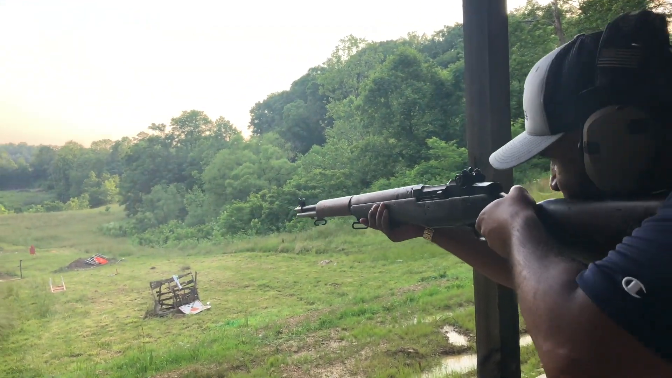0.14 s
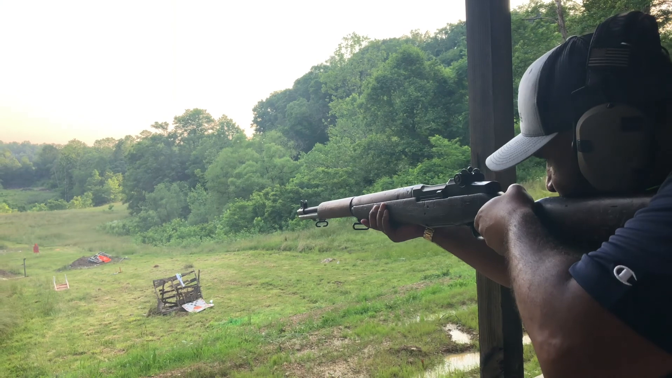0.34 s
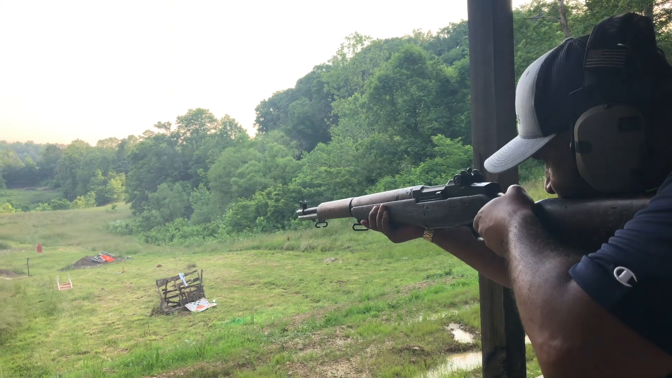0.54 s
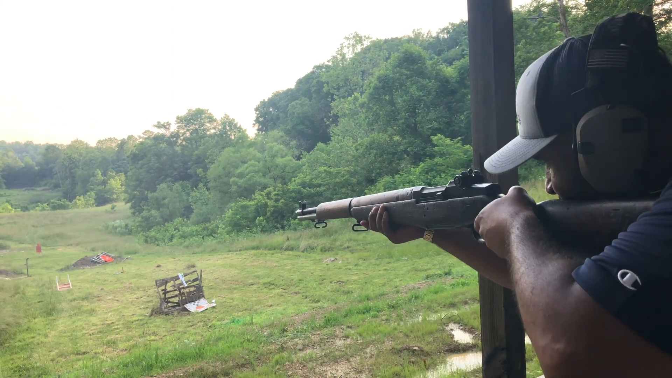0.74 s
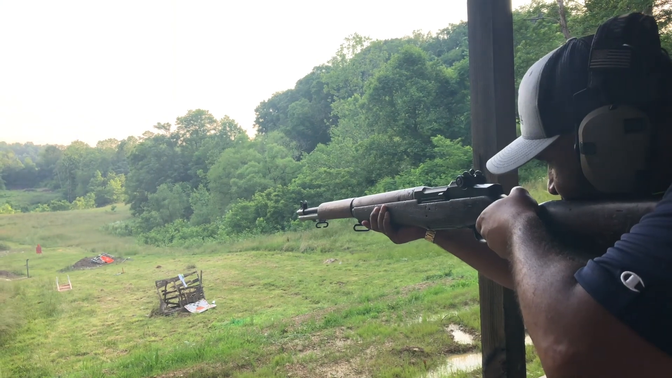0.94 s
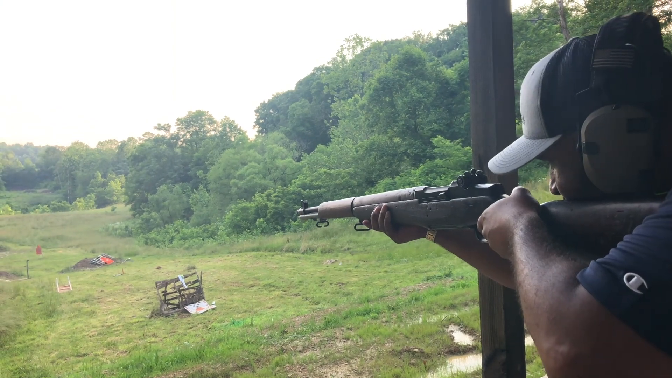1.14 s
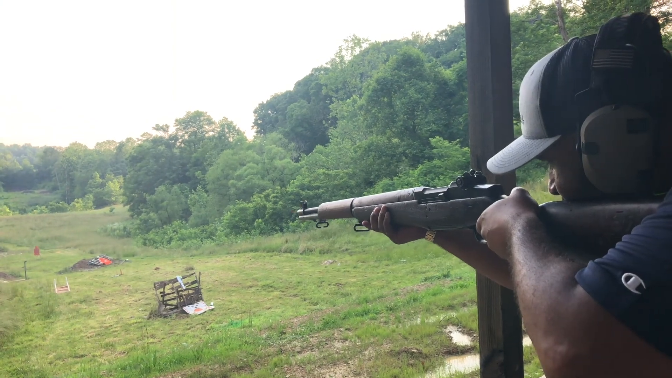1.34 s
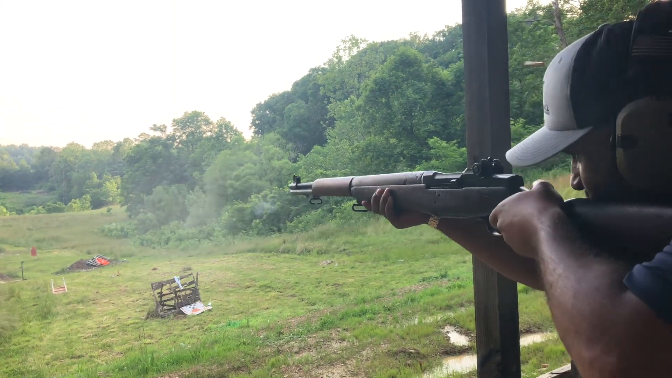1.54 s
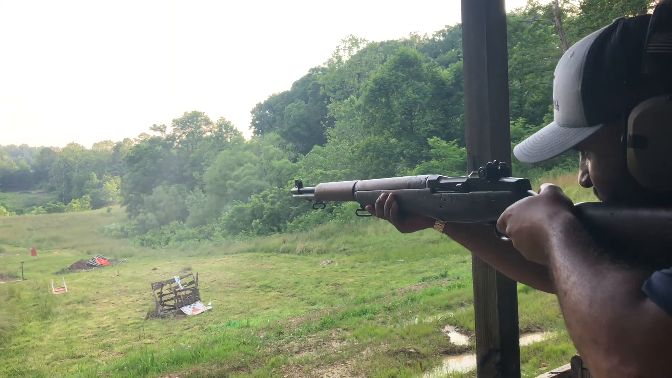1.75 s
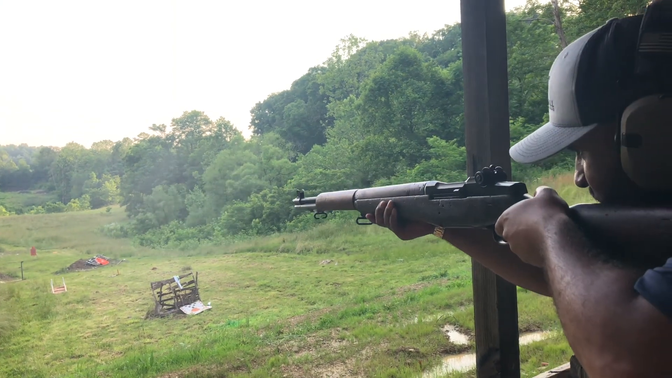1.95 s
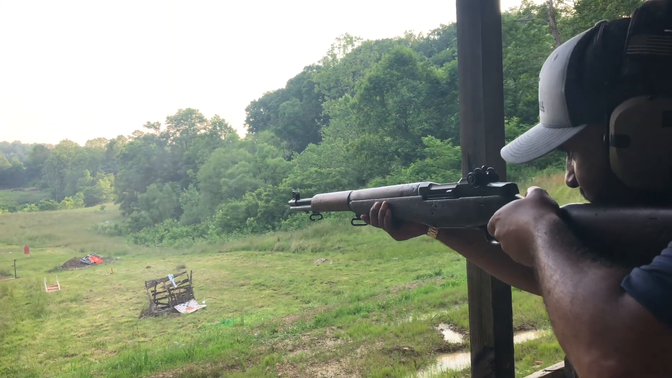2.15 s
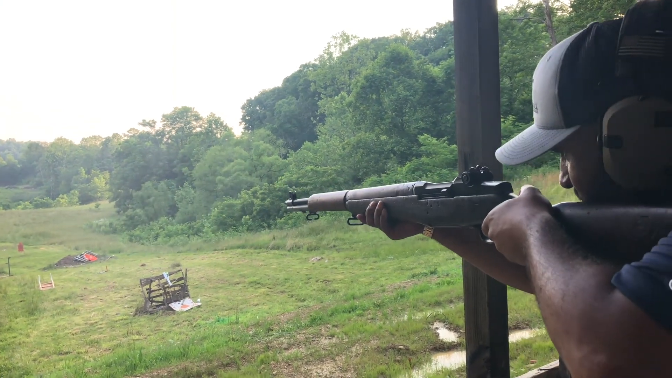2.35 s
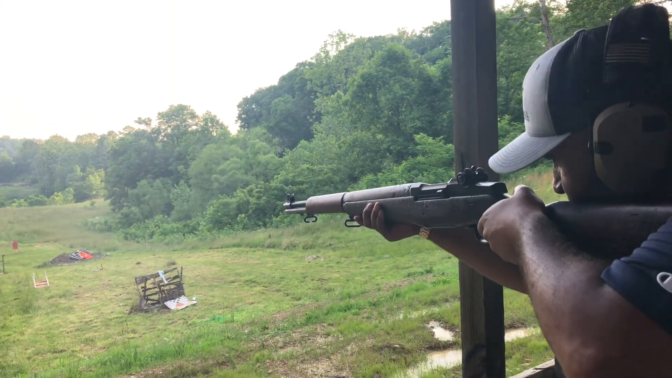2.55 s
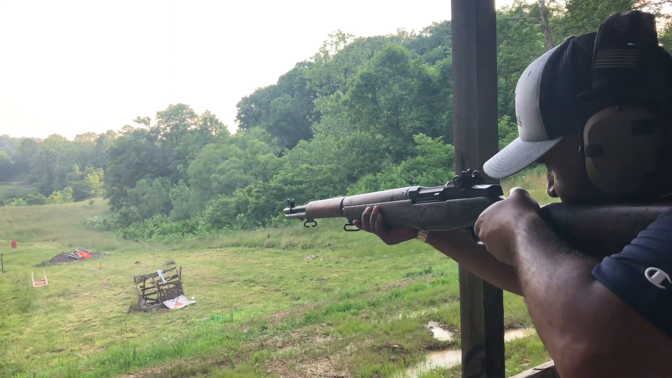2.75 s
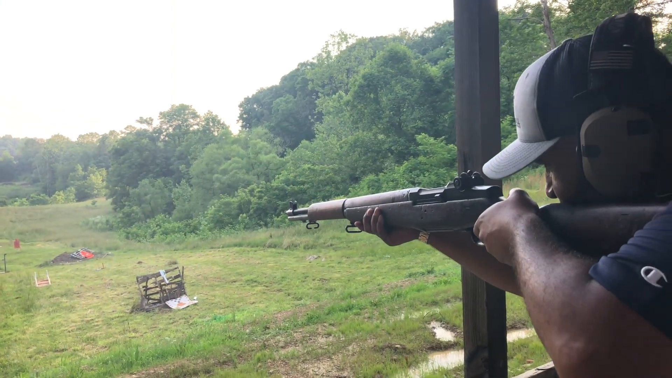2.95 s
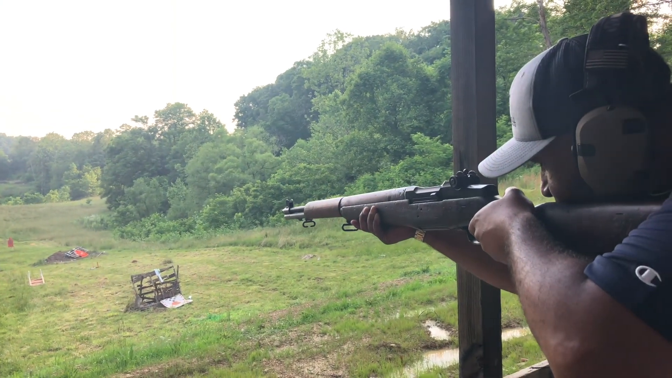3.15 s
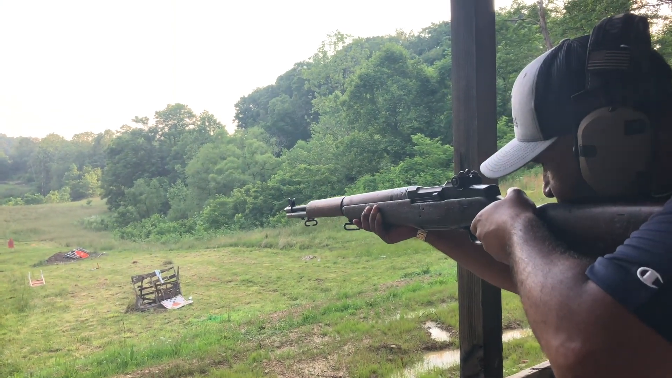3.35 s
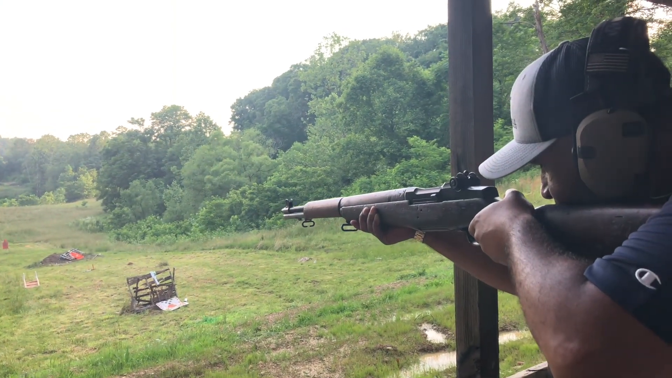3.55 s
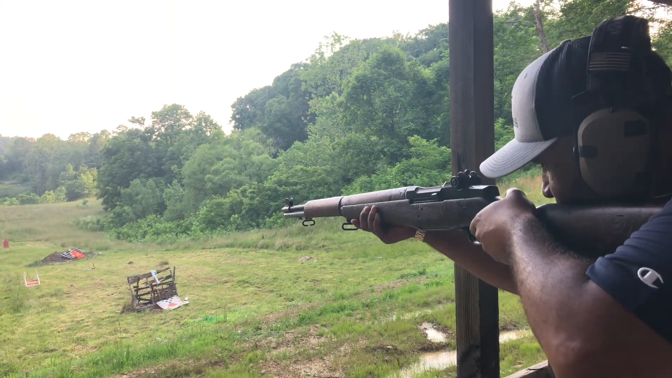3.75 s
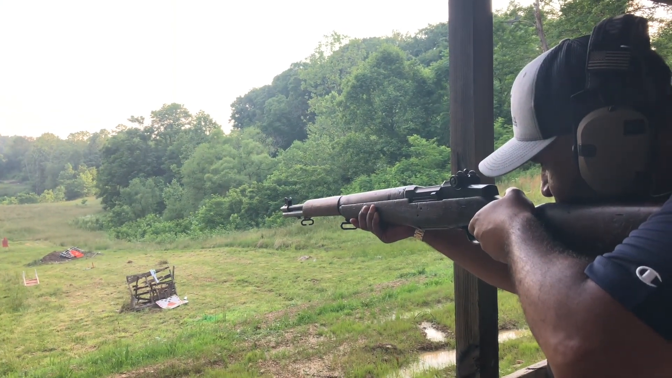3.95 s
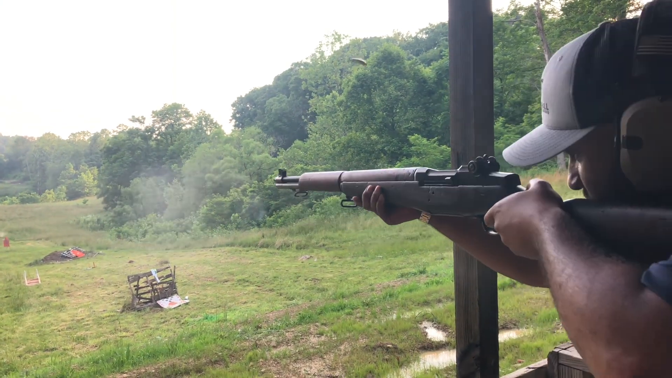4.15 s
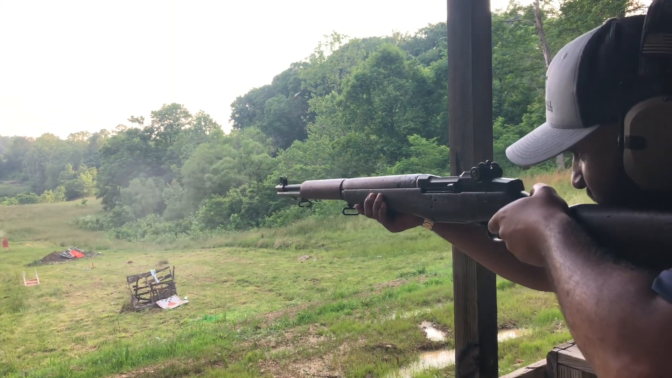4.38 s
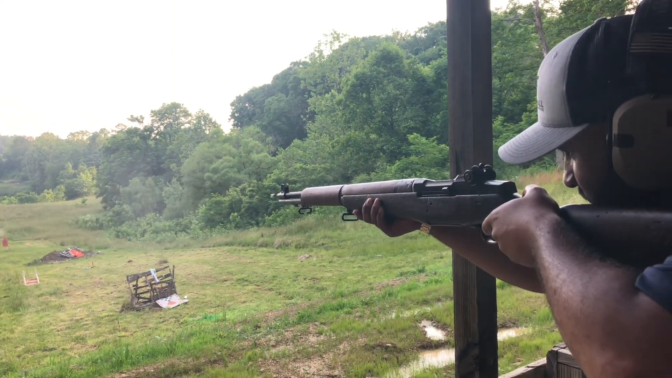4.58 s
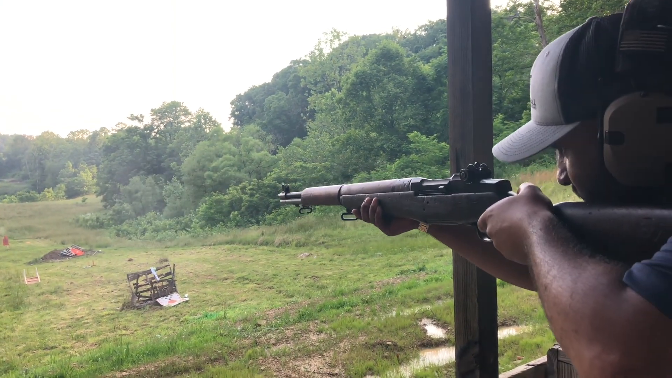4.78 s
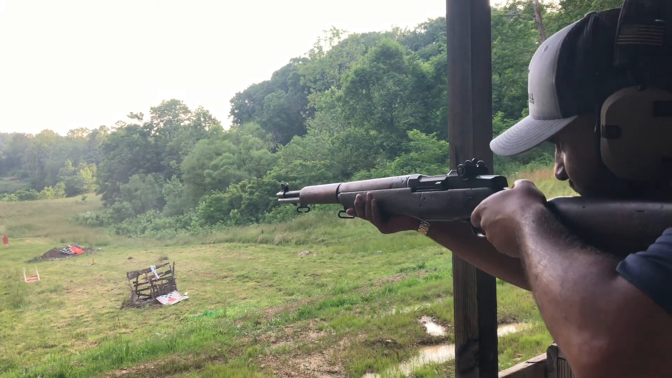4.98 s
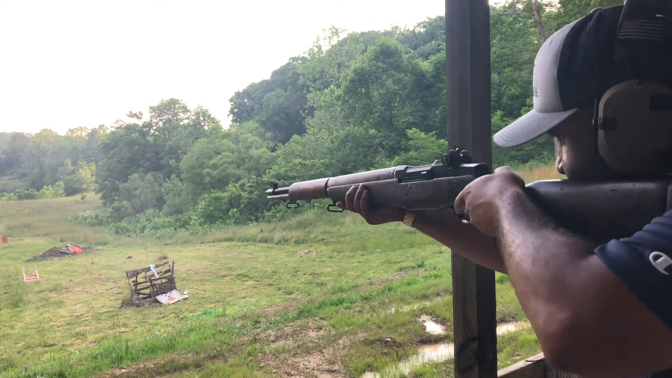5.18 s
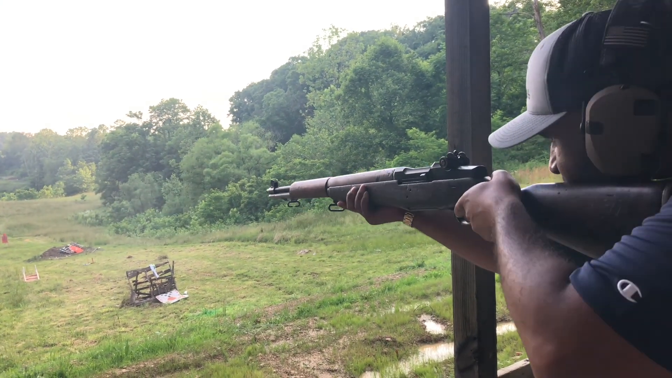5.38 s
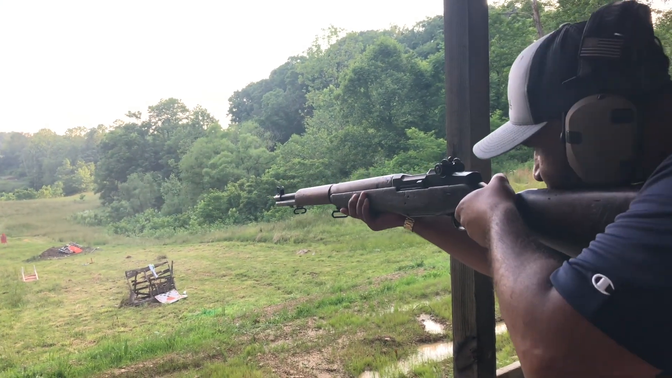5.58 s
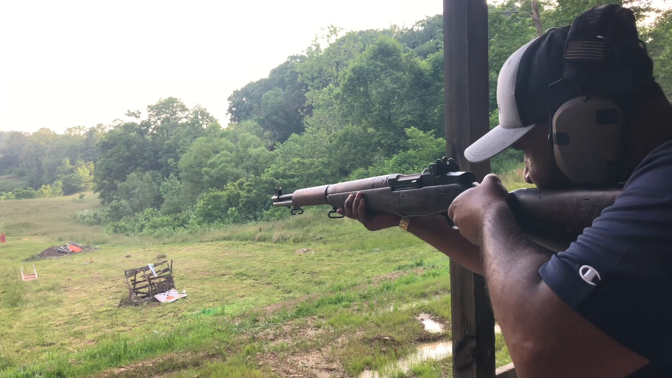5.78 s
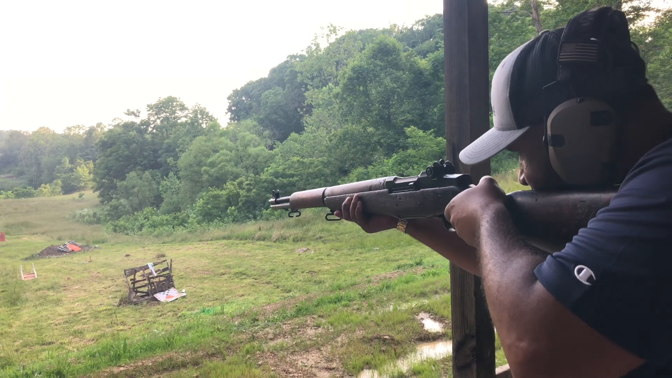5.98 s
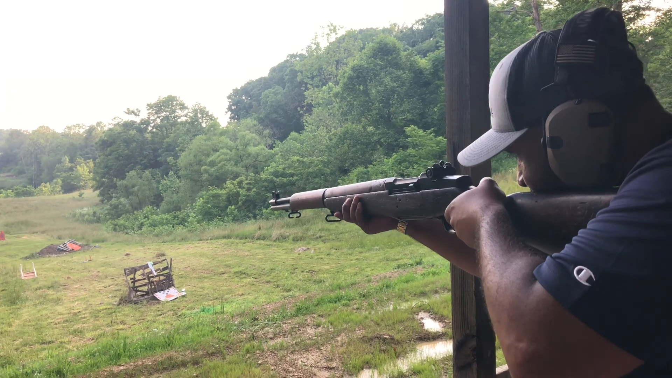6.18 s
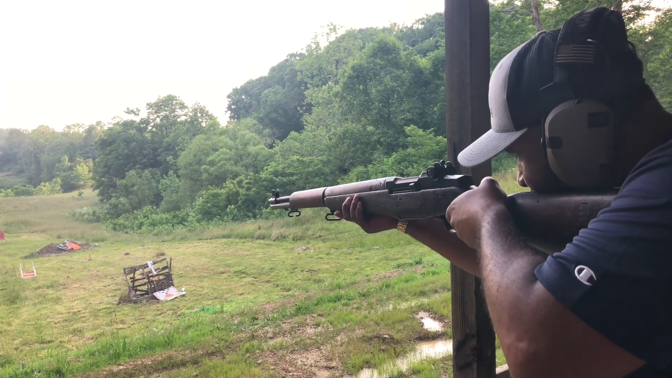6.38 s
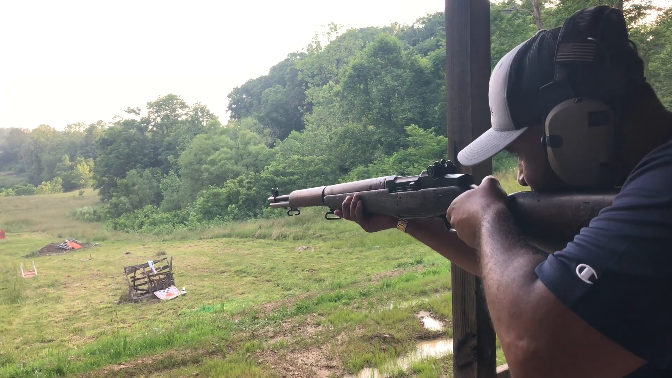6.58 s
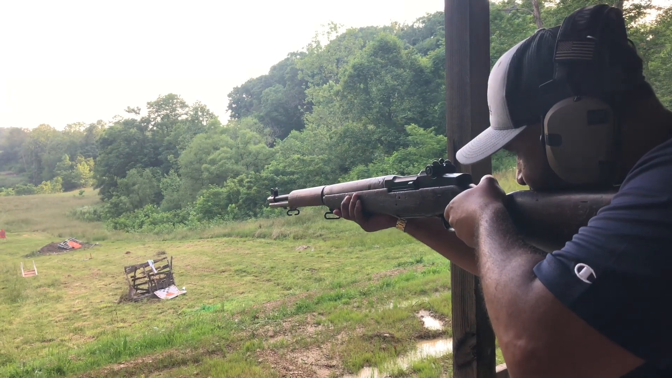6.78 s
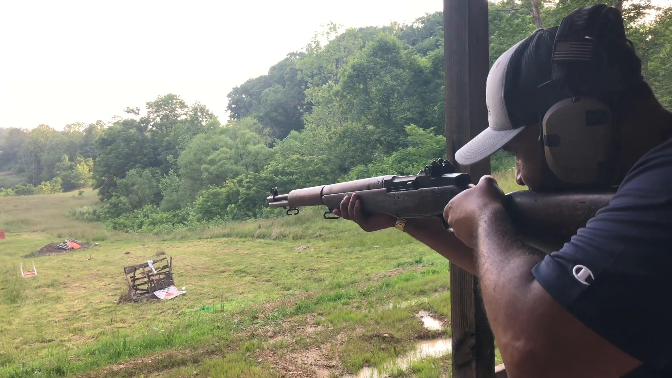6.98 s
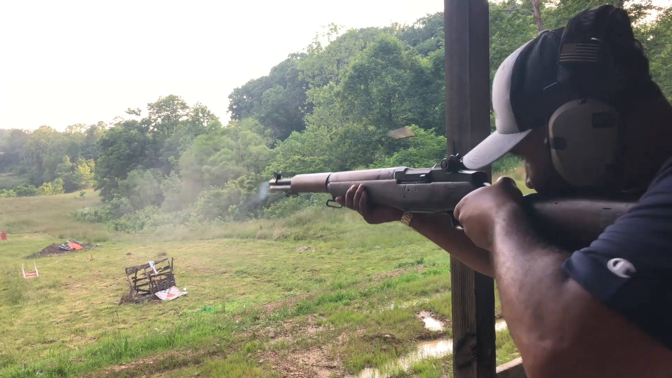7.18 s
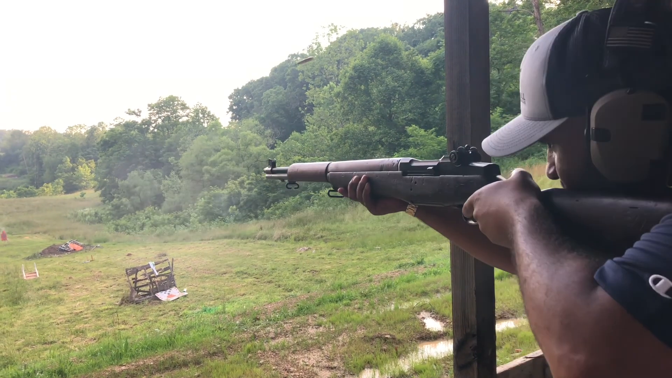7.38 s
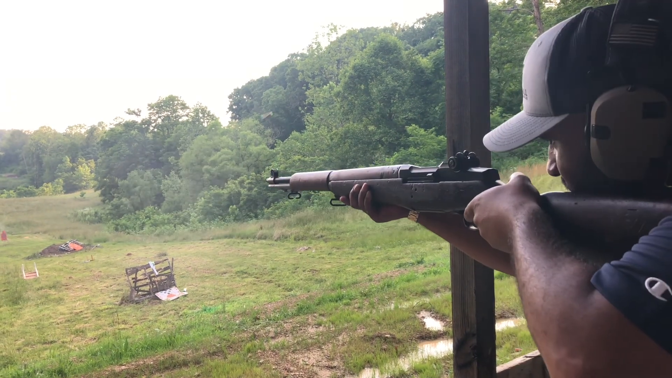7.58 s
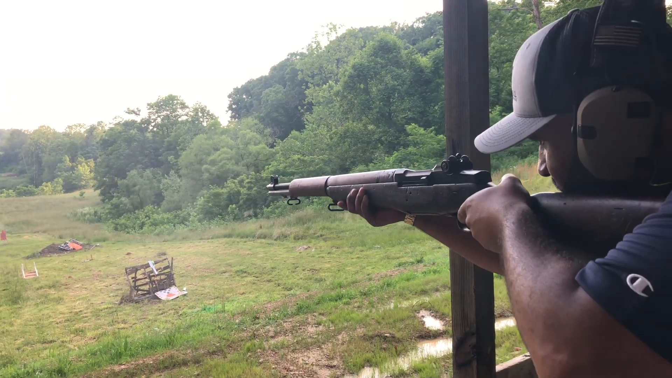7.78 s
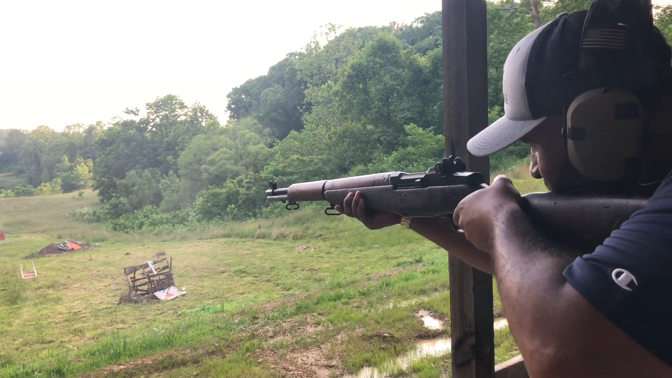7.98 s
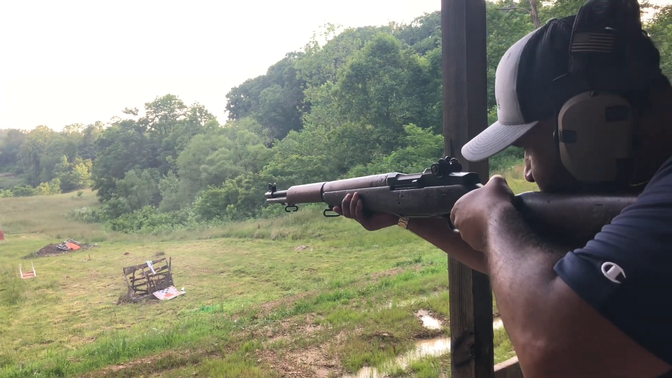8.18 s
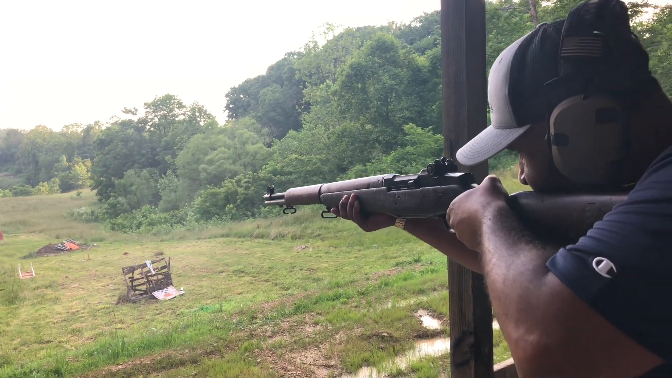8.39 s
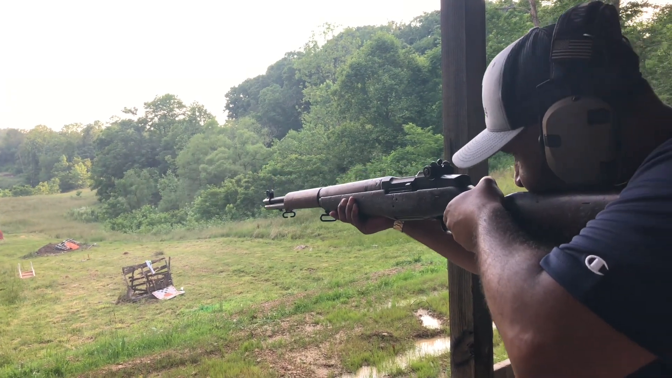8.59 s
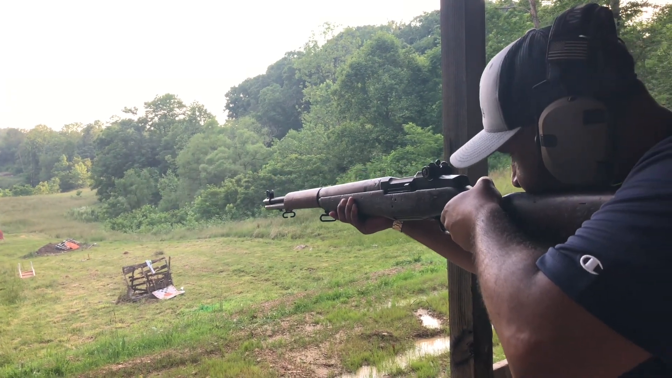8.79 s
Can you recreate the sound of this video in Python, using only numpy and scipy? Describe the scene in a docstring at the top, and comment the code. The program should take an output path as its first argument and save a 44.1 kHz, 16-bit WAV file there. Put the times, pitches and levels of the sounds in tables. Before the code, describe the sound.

Outdoors beneath a firing-point roof, heard in mono near the shooter. It starts with the dim echo tail of an earlier shot, a soft low far rumble, faint high insect song with brief rasps at 0.5 and 1.1 s, and a barely audible thin tone. At 1.4 s a tiny dry click runs into a massive rifle crack and boom, slapping off roof and ground, then rolling off the trees for seconds. A spent case ticks and pings at 2.4, 2.6 and 2.8 s. The second, slightly stronger shot comes at 4.0 s, its case landing at 5.0 and 5.2 s; the rumble swells gently around 6 s as insects return. The third shot hits at 7.15 s; at 7.5 s its bullet strikes steel, a tick and bright clang with wavering ringing, fading through the echoes. Fainter case pings follow at 8.2 and 8.5 s.

```python
"""A roofed firing point over a grass range ringed by trees, where a rifle fires single shots. Each report is
shaped noise whose echoes from roof, ground and tree lines follow much the same pattern. The last bullet strikes
a steel plate (a clang and wavering sines); spent cases tick and ring on the floor. Behind it all lie a far
rumble, singing insects and faint thin tones, all made from filtered noise; the thin tones at 920 and 1600 Hz
after the strike are the plate's low modes ringing on."""
import sys
import numpy as np
from scipy import signal
from scipy.io import wavfile

SR = 44100
rng = np.random.default_rng(int(sys.argv[2]) if len(sys.argv) > 2 else 0)


def generate_wav(sig):
    """Save sig (samples, or channels by samples) to the path in sys.argv[1] as 16-bit PCM at SR."""
    pcm = np.round(np.clip(np.atleast_2d(sig).T, -1, 1) * 32767).astype(np.int16)
    wavfile.write(sys.argv[1], SR, pcm)


N = 389403

# Rifle shots, the first one fired before we listen:
# (time [s], blast level [dB], near echo level [dB], far echo level [dB])
SHOT_LIST = [(-1.35, .1, .1, 3.5), (1.4225, .1, .1, .1), (4.0096, .8, 1.5, -1.2), (7.166, .6, .1, 1.5)]

PLATE_S = 7.4855   # when the bullet's strike on the plate is heard
PUFF_SIZE = 20000   # length of the short sounds, in samples


def shots():
    """The blast scattered by thousands of surfaces; the longer the path, the more treble the air takes."""
    # What one shot sends to the ear, each a swell that holds and dies: (lag [s], rise [s], hold [s],
    # time to fall 60 dB [s], boom level [dB], body level [dB], crack level [dB])
    arrivals = [(.0005, .0045, .016, .02, -50, -38, -37), (.006, .013, .004, .1, -43, -28, -34),
                (.0215, .003, .027, .3, -42, -27, -18), (.028, .03, .015, .3, -32, -21, -32),
                (.10, .085, .005, .65, -39.5, -30.5, -35), (.17, .07, .04, .6, -39.5, -38, -33),
                (.405, .025, .018, .13, -52, -50, -41), (.485, .015, .003, .15, -52, -43, -55),
                (.62, .05, .01, .5, -62, -52, -55), (.2, .1, .05, 3.2, -60, -55, -46.5),
                (.2, .1, .05, 5.5, -54.5, -46.5, -60), (1.05, .7, .45, 6.5, -66, -60, -65)]
    # Where boom, body and crack sit: (frequency [Hz])
    column_hz = [130, 500, 2000]
    # Tone of the blast, added to the three columns: (frequency [Hz], level [dB per Hz])
    blast_tone = [(30, -22), (65, -11), (110, -3), (160, 2.5), (210, .3), (300, 2.6), (450, .3), (620, 3),
                  (1000, -.7), (1400, .7), (2000, -.6), (4000, -1.5), (8000, -4), (11000, -7), (15000, -13)]
    # Treble lost in the air: (frequency [Hz], loss [dB per s of travel])
    air_loss = [(2000, 0.1), (4000, 7), (6500, 16), (11000, 31), (16000, 62)]
    same_share = .7   # how much of the echo pattern repeats from shot to shot
    patchy_db, patch_hz = 1.3, 25   # depth and speed of the uneven scatter
    near_from_s, far_from_s = .12, .5   # lags at which near and far echoes take over
    snap_db, snap_lag_s, snap_t60_s = -16, .023, .09   # bright burst at the head of the report

    size = 141000
    lag = np.arange(size) / SR
    power = 0
    for s, rise, hold, t60, *column_db in arrivals:
        power = power + (from_db(column_db)[:, None] * swell(lag - s, rise, hold, t60)) ** 2
    levels = 10 * np.log10(power + 1e-12)

    # One noise common to all shots, blended with one of each shot's own
    white = rng.standard_normal((2, 1 + len(SHOT_LIST), size))
    mixed = np.sqrt(same_share) * white[:, :1] + np.sqrt(1 - same_share) * white[:, 1:]
    reports = 0
    for hz, band in bands(mixed):
        # How much boom, body and crack each count at this pitch
        weights = [np.interp(np.log(hz), np.log(column_hz), one) for one in np.eye(3)]
        level_db = weights @ levels + at_hz(blast_tone, hz)
        level_db = level_db - at_hz(air_loss, hz) * lag
        level_db = level_db + patchy_db * drift(patch_hz, size)
        # Offset the extra power of wider bands, up to 2 kHz
        width_gain = np.sqrt(SR / 4 / min(1.5 * hz, 3000))
        reports = reports + band * from_db(level_db) * width_gain

    near = np.clip((lag - near_from_s) * 20, 0, 1)
    far = np.clip(lag - far_from_s, 0, 1)
    out = np.zeros(N)
    for (s, blast_db, near_db, far_db), report in zip(SHOT_LIST, reports):
        add(out, report * from_db(blast_db + near_db * near + far_db * far), s)
        snap = burst(snap_t60_s, 4000, PUFF_SIZE)
        add(out, from_db(snap_db + blast_db) * snap, s + snap_lag_s)
    return out


def plate():
    """The strike arrives as a tick, then a clang; the ringing comes by many paths, so each mode wavers."""
    # Ringing modes of the steel: (frequency [Hz], level [dB], time to fall 60 dB [s])
    plate_modes = [(915, -16, 4.0), (1301, -11, 1.6), (1336, -7, 1.2), (1590, -10, .9), (1961, -.8, 1.1),
                   (2015, -15, 1.2), (3215, -2.5, 1.1), (3240, -20.5, 4.0), (3291, -12, 1.2),
                   (3673, -14, 1.2), (4167, -17, 1.2), (4678, -22.5, 2.8), (5038, -15, 1.9),
                   (5250, -20, 1.3), (5426, -17, 1.7), (5580, -19, 1.3), (5959, -17, 1.4), (6175, -21, 1.1),
                   (6530, -24, 1.2), (6643, -20, .9), (6831, -19, .8), (7101, -22, .9), (7305, -22, 2.0),
                   (7634, -18, .86), (8021, -26, 1.0), (8613, -22, .66), (9249, -18, .72), (9566, -15, .45),
                   (10550, -20, .45)]
    # Tone of the noisy clang: (frequency [Hz], level [dB per Hz])
    clang_tone = [(300, -20), (700, -7), (1300, 0.1), (1900, -7), (4000, -12), (8000, -15), (11000, -21),
                  (15000, -33)]
    tick_db, clang_db, ring_db = -16, -32, -34.5
    waver_db, waver_rad = 2.2, .45   # waver in loudness and in phase
    hold_s, sag_s, sag_db = .27, .04, 5   # the ringing is fed by near echoes, then sags

    size = 66000
    lag = np.arange(size) / SR
    clang_shape = swell(lag - .011, rise=.006, hold=.032, t60=.6)
    clang = coloured(clang_tone, size) * from_db(clang_db) * clang_shape

    tick = from_db(-9) * ring(burst(.008, 800, PUFF_SIZE), 1300, .006)
    tick = tick + from_db(-14) * burst(.012, 800, PUFF_SIZE)

    rings = 0
    for hz, db, t60 in plate_modes:
        level = from_db(db + ring_db - 60 * lag / t60 + waver_db * drift(9, size))
        phase = 2 * np.pi * hz * lag + waver_rad * drift(7, size)
        rings = rings + level * np.sin(phase)
    onset = np.clip((lag - .012) / .012, 0, 1)
    sag = from_db(-sag_db * np.clip((lag - hold_s) / sag_s, 0, 1))

    out = np.zeros(N)
    add(out, clang + onset * sag * rings, PLATE_S)
    add(out, from_db(tick_db) * tick, PLATE_S)
    return out


def cases():
    """Each landing is a bright tick with a short wash under the roof, and sets three brass modes ringing."""
    # Spent cases landing and bouncing: (time [s], tick level [dB], low ring level [dB],
    # middle ring level [dB], high ring level [dB], pitch factor [ratio])
    landings = [(.03, -88, -97, -80, -90, 1.001), (2.414, -56.5, -74, -66, -68, .999),
                (2.643, -65, -74, -66, -67, .999), (2.781, -68, -84, -70, -84, .999),
                (5.031, -53, -67, -63, -62, 1.015), (5.188, -66, -85, -80, -85, 1.005),
                (5.25, -90, -94, -85, -88, 1.005), (5.382, -92, -96, -84, -94, 1.005),
                (5.485, -88, -92, -84, -81, 1.012), (8.174, -62, -92, -76, -86, 1.001),
                (8.528, -75, -90, -65, -88, 1.001)]
    # Ringing modes of a case: (frequency before the pitch factor [Hz], time to fall 60 dB [s])
    brass_modes = [(7690, .4), (9520, .42), (13740, .4)]
    out = np.zeros(N)
    for s, tick_db, *ring_db, pitch in landings:
        tick = from_db(-3) * burst(.025, 7000, PUFF_SIZE)
        # A gentle low-pass softens the wash
        wash = from_db(-1.5) * signal.lfilter([.5], [1, -.5], burst(.32, 4500, PUFF_SIZE))
        add(out, from_db(tick_db) * (tick + wash), s)

        rattle = burst(.002, 3000, PUFF_SIZE)   # a short hard contact
        rattle = rattle / np.sqrt(np.sum(rattle ** 2))   # unit energy
        for (hz, t60), level_db in zip(brass_modes, ring_db):
            # A dented mouth splits each mode in two
            pair = ring(rattle, hz * pitch, t60)
            pair = pair + .35 * ring(rattle, hz * pitch * 1.004, t60)
            tumble = from_db(4.0 * drift(40, PUFF_SIZE))   # the case turns as it rings
            add(out, from_db(level_db) * tumble * pair, s)
    return out


def hammer():
    """A dry tick of the action just before each report we hear, with a duller knock and a short wash."""
    # Ticks of the action: (time [s], level [dB])
    hammer_ticks = [(1.4037, -49), (3.9930, -41), (7.1428, -41)]
    out = np.zeros(N)
    for s, db in hammer_ticks:
        tick = burst(.025, 900, PUFF_SIZE)
        knock = ring(tick, 1500, .008)
        wash = burst(.12, 900, PUFF_SIZE)
        sound = from_db(-4) * tick + from_db(-12) * knock + from_db(-22) * wash
        add(out, from_db(db) * sound, s)
    return out


def insect_chorus():
    """Noise through a resonance sings, under a high sizzle; both drop at each shot and climb back."""
    recover_s, recover_db_per_s = 3.0, 9
    t = np.arange(N) / SR
    since_shot = np.min([np.where(t > s, t - s, np.inf) for s, *_ in SHOT_LIST], axis=0)
    hush = from_db(-recover_db_per_s * np.clip(recover_s - since_shot, 0, None))
    song = from_db(-76) * whistle(5680, width_hz=480)
    sizzle = from_db(-87) * whistle(11500, width_hz=9000)
    return hush * (song + sizzle)


def insect_rasps():
    """A nearer insect rasps: rounded gates let short stretches of one resonant noise through."""
    # Single rasps: (time [s], length [s], level [dB])
    rasp_list = [(.48, .16, -88), (1.14, .17, -83), (3.15, .14, -88), (3.74, .15, -84), (5.68, .15, -90),
                 (6.06, .14, -88), (6.82, .2, -83)]
    gate = sum(from_db(db) * arch(s, length) for s, length, db in rasp_list)
    return gate * whistle(6950, width_hz=350)


def thin_tones():
    """Noise through a very narrow resonance makes faint tones that fade in and out; after the strike the
    plate's low modes ring on this way."""
    # Faint tones, the last two being the plate's low modes ringing on: (time [s], length [s], frequency [Hz],
    # level [dB])
    tone_list = [(-.5, 2.2, 920, -78), (2.5, 1.55, 1600, -80), (7.7, 1.1, 1600, -77), (7.7, 1.5, 920, -76)]
    return sum(from_db(db) * arch(s, length) * whistle(hz, width_hz=12) for s, length, hz, db in tone_list)


def far_rumble():
    """Steady low-heavy noise that wanders slightly in level and grows for a while."""
    # Tone of the rumble: (frequency [Hz], level [dB per Hz])
    rumble_tone = [(30, -18), (70, 1.5), (190, -11), (400, 1.5), (900, -8), (1700, -16), (3000, -20),
                   (4700, -29), (6400, -41), (8000, -46), (12000, -50), (15500, -56)]
    base_db, swell_db = -65, 5
    level_db = base_db + swell_db * arch(5.6, length=1.7) + 1.5 * drift(1.5, N)
    return from_db(level_db) * coloured(rumble_tone, N)


def from_db(db):
    """Turn decibels into a gain."""
    return 10 ** (np.asarray(db) / 20)


def rms_one(x):
    """Scale to an average strength (rms) of 1."""
    return x / np.sqrt(np.mean(x ** 2) + 1e-20)


def at_hz(points, hz):
    """Read a spectrum between its points, on a log-frequency axis."""
    points = np.array(points)
    return np.interp(np.log(hz), np.log(points[:, 0]), points[:, 1])


def add(out, sound, s):
    """Mix a sound in at time s; what falls outside is lost."""
    i = round(s * SR)
    start, end = max(i, 0), min(i + len(sound), N)
    if end > start:
        out[start:end] += sound[start - i:end - i]


def bands(white):
    """Cut two noises, taken in turn, into half-octave bands: yields (centre in Hz, band)."""
    edges = 28 * 2 ** np.arange(0, 9.6, .5)
    for k, (low, high) in enumerate(zip(edges, edges[1:])):
        band_filter = signal.butter(2, [low, high], "band", fs=SR, output="sos")
        yield np.sqrt(low * high), signal.sosfilt(band_filter, white[k % 2])


def coloured(spectrum, size):
    """Steady noise with a given spectrum, built band by band; rms 1."""
    white = rng.standard_normal((2, size))
    return rms_one(sum(from_db(at_hz(spectrum, hz)) * band for hz, band in bands(white)))


def ring(clicks, hz, t60):
    """A resonance: each unit click starts a sine of height 1 that falls 60 dB in t60 seconds."""
    r = from_db(-60 / (t60 * SR))   # what remains after one sample
    w = 2 * np.pi * hz / SR
    return signal.lfilter([0, np.sin(w)], [1, -2 * r * np.cos(w), r * r], clicks + 1e-18)


def whistle(hz, width_hz):
    """Noise sent twice through one resonance; rms 1."""
    r = np.exp(-np.pi * width_hz / SR)
    feedback = [1, -2 * r * np.cos(2 * np.pi * hz / SR), r * r]
    once = signal.lfilter([1, 0, -1], feedback, rng.standard_normal(N))
    return rms_one(signal.lfilter([1, 0, -1], feedback, once))


def burst(t60, low_hz, size):
    """A puff of noise that dies away, with what lies below low_hz weakened."""
    noise = rng.standard_normal(size) * from_db(-60 * np.arange(size) / SR / t60)
    return signal.sosfilt(signal.butter(2, low_hz, "high", fs=SR, output="sos"), noise)


def drift(rate_hz, size):
    """Slow random wander of rms 1: coarse noise through a double one-pole low-pass."""
    step = 40   # samples between coarse points
    r = np.exp(-2 * np.pi * step * rate_hz / SR)
    coarse = rng.standard_normal(size // step + 2002)
    slow = signal.lfilter([1], [1, -2 * r, r * r], coarse)[2000:]   # skip the filter's start-up
    return np.interp(np.arange(size) / step, np.arange(len(slow)), rms_one(slow))


def swell(lag, rise, hold, t60):
    """Silent before lag 0, a straight rise to 1, a hold, then an exponential fall."""
    fall_s = np.clip(lag - rise - hold, 0, None)
    return np.clip(lag / rise, 0, 1) * from_db(-60 * fall_s / t60)


def arch(s, length):
    """A rounded gate from s to s + length."""
    progress = np.clip((np.arange(N) / SR - s) / length, 0, 1)
    return np.sqrt(np.abs(np.sin(np.pi * progress)))


def scene():
    """Everything in one channel; the shots' level dips briefly after the plate's tick."""
    dip_db, dip_lag_s, dip_width_s = 9, .009, .004
    since_dip = np.arange(N) / SR - PLATE_S - dip_lag_s
    dip = from_db(-dip_db * np.exp(-(since_dip / dip_width_s) ** 2))
    events = dip * shots() + plate() + cases() + hammer()
    background = insect_chorus() + insect_rasps() + thin_tones() + far_rumble()
    return (events + background)[None]


def record(dry):
    """The microphone drops the deep bass, peaks are rounded, the top is cut."""
    bass_cut = signal.butter(2, 70, "high", fs=SR, output="sos")
    top_cut = signal.cheby2(14, 60, 16100, fs=SR, output="sos")   # 60 dB down from 16.1 kHz
    heard = signal.sosfilt(bass_cut, dry)
    rounded = .7 * np.tanh(heard / .7)
    return signal.sosfilt(top_cut, rounded)


dry = scene()
out = record(dry)
generate_wav(out)
```